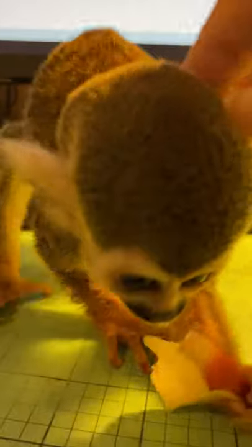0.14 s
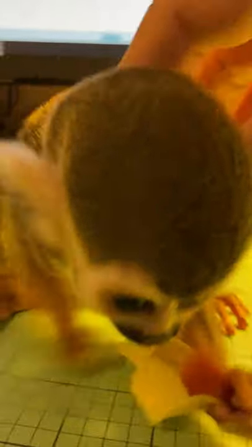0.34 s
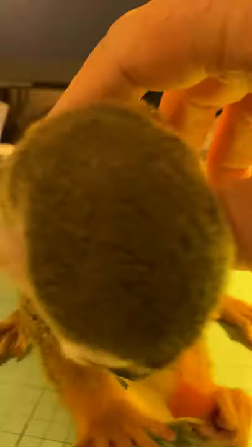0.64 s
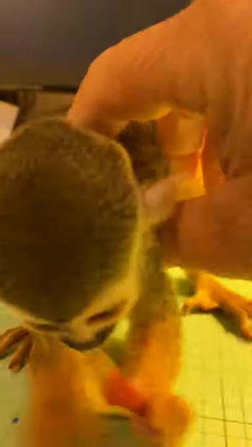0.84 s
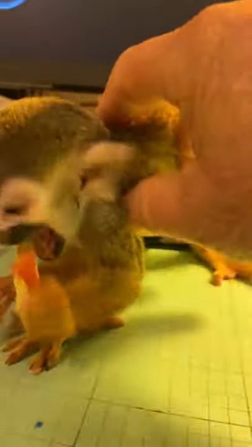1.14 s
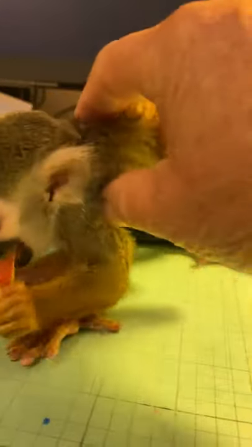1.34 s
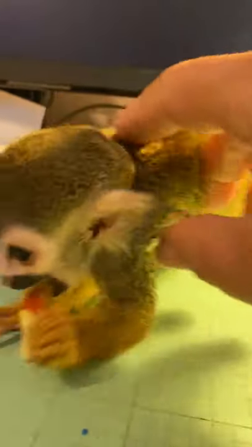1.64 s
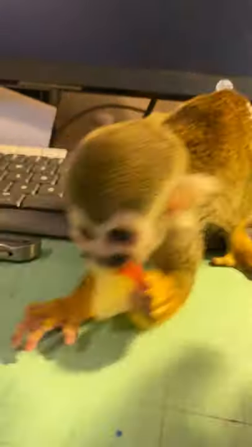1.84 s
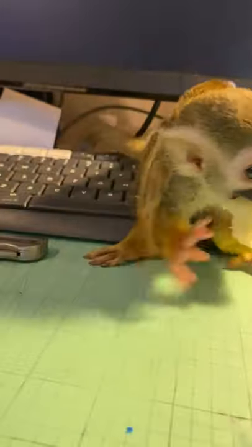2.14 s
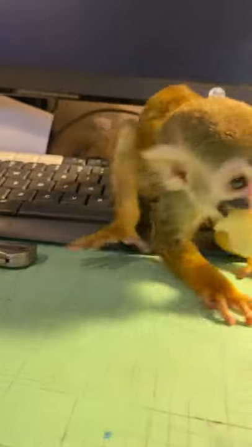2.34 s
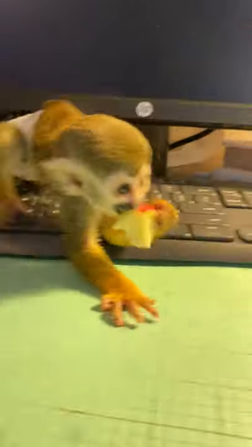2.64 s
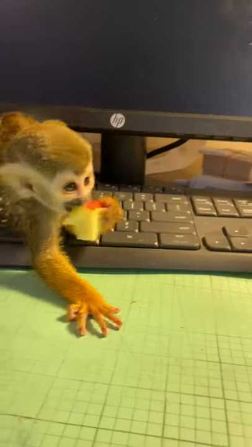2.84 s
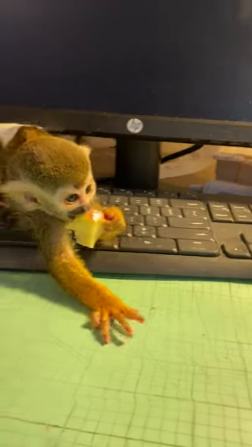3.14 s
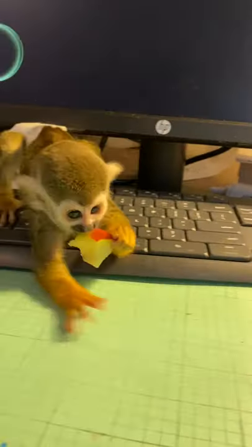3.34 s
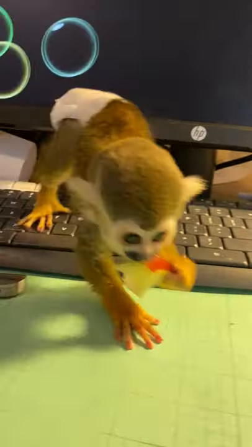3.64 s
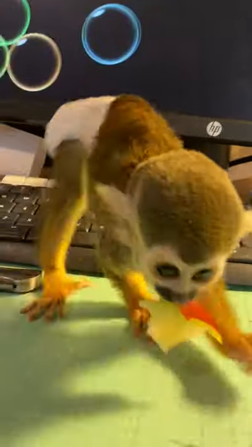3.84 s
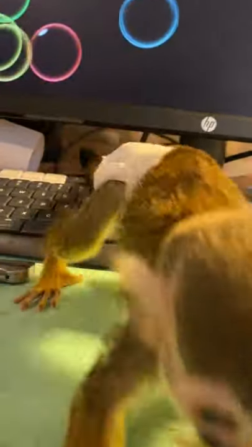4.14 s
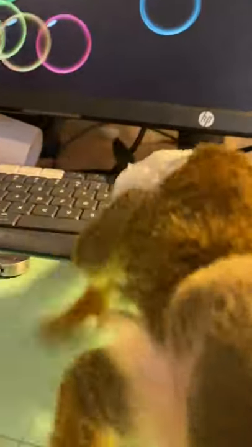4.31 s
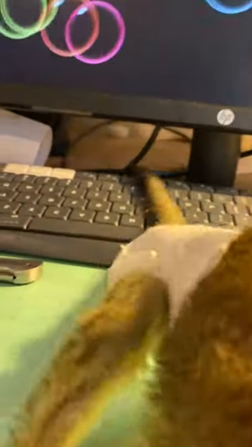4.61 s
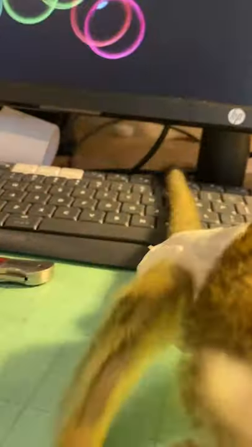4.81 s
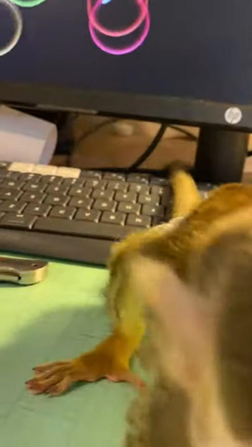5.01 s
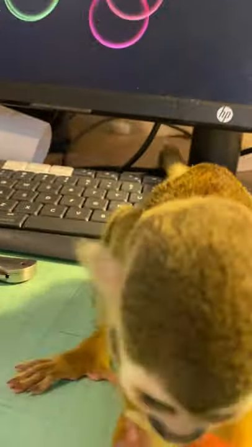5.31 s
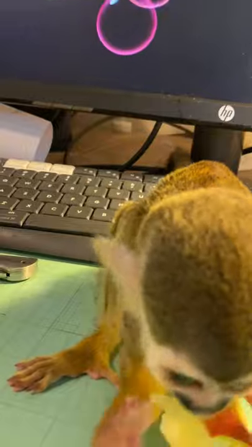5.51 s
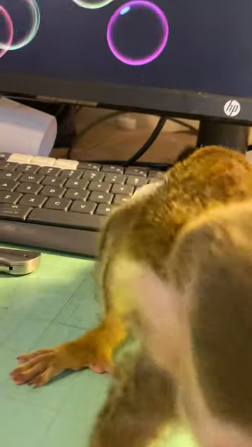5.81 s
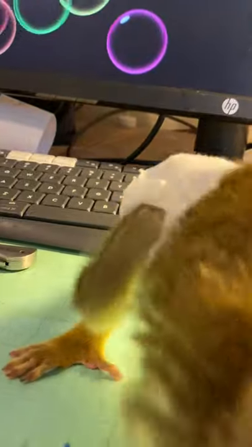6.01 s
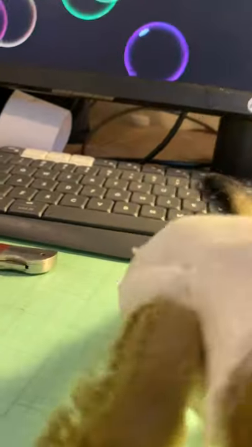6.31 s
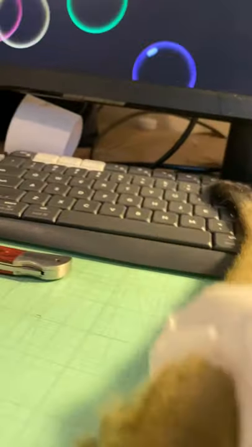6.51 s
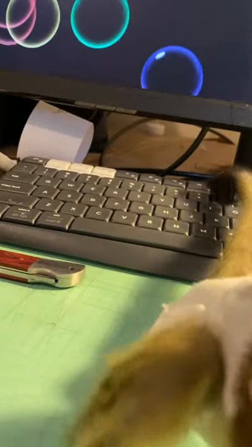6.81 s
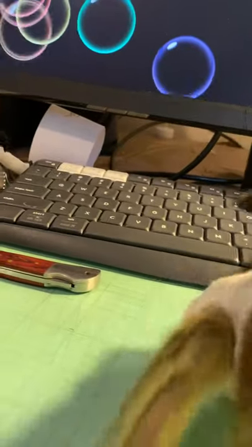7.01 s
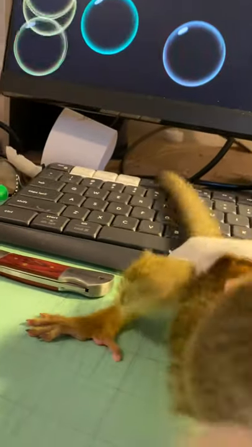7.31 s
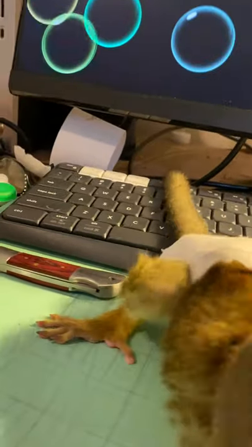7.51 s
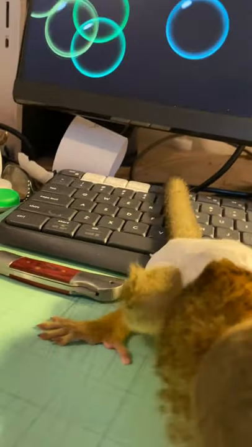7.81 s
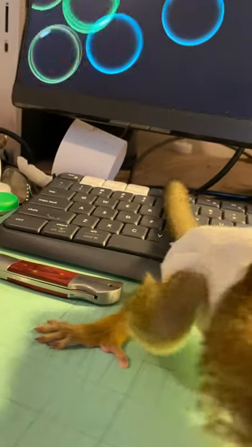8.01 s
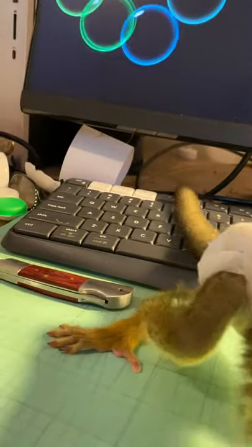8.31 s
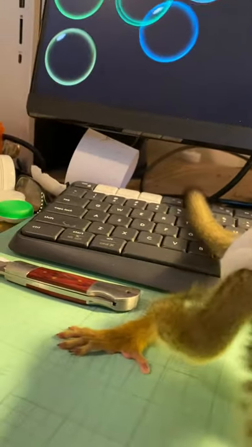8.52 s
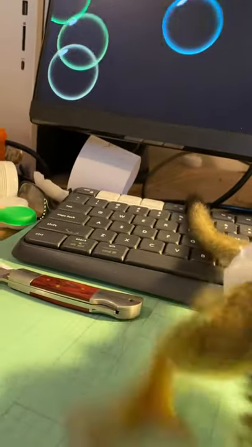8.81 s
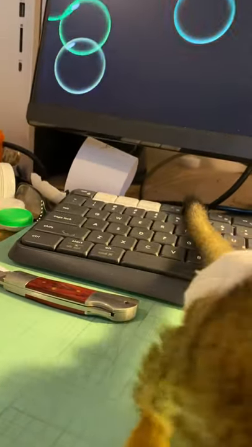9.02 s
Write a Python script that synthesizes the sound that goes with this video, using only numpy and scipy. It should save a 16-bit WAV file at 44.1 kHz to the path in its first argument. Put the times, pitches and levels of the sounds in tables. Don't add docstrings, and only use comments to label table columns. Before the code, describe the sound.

Close to the microphone in a quiet furnished room, a small monkey utters brief, very high whistled calls that glide, waver and fall. Between them are tiny claw taps on a mat and keys, plastic knocks, soft paw thuds, fur rustle and moist fruit nibbling. A longer quavering note comes near the end, followed by wet chewing and one last loud chirp. A low fan hums throughout.

```python
import sys
import numpy as np
from scipy import signal
from scipy.fft import rfft, irfft, next_fast_len
from scipy.io import wavfile
from scipy.ndimage import uniform_filter1d, map_coordinates

SR = 44100
rng = np.random.default_rng(int(sys.argv[2]) if len(sys.argv) > 2 else 0)


def materialize(psi):
    bounded = np.clip(np.atleast_2d(psi).T, -1, 1)
    quanta = np.round(bounded * 32767).astype(np.int16)
    wavfile.write(sys.argv[1], SR, quanta)


def convert_level_to_amplitude(level_db):
    exponent = np.asarray(level_db, float) / 20
    return 10 ** exponent


N = 403515
SIZE = next_fast_len(N + SR)
HZ = np.arange(SIZE // 2 + 1) * SR / SIZE

SLUR = None
# (overtone offset [dB], contour of (time [s], pitch [Hz], level [dB]))
CALL_TAIL = [
    (6, [(0.0, 6740, -18.5), (0.012, 6460, -19), (0.02, 6350, -24.5), (0.026, 6180, -24), (0.031, 6280, -23), (0.037, 6210, -26.5), (0.043, 5900, -29.5)]),
]
CALL_STROKED = [
    (3.002, [(1.01, 7930, -23.5), (1.021, 6970, -27.5)]),
    (12, [(1.024, 6870, -34), (1.034, 6330, -30.5), (1.045, 6500, -29), ]),
    (20, [SLUR, (1.052, 7250, -26)]),
    (30, [SLUR, (1.058, 7900, -24)]),
    (0, [SLUR, (1.062, 8150, -24), (1.07, 8350, -23.5), (1.077, 8125, -27), (1.09, 7500, -26), (1.094, 7300, -36)]),
    (0, [(1.114, 8650, -13), (1.122, 8900, -14), (1.126, 8880, -3.5), (1.13, 8550, -6), (1.134, 8150, -11), (1.143, 8720, -10.5), (1.149, 8240, -20), (1.159, 7480, -24)]),
    (5.5, [(1.189, 10160, -20.5), (1.203, 9783, -16), (1.223, 9180, -13.5), (1.234, 8670, -19), (1.255, 9300, -15.5), (1.276, 8550, -14.5), (1.29, 8080, -19)]),
]
CALL_BACKING = [
    (3.5, [(2.352, 7190, -35.5), (2.364, 6250, -30.5), (2.367, 6175, -20), (2.38, 6580, -15.5), (2.389, 7090, -13), (2.393, 7620, -25), (2.396, 6780, -25)]),
    (-5.5, [(2.451, 8867, -26), (2.459, 9203, -37), (2.47, 8810, -16.5), (2.479, 8230, -8), (2.491, 7580, -17.5), (2.504, 7520, -21), (2.512, 7240, -21)]),
    (-14, [SLUR, (2.533, 8160, -12), (2.555, 8070, -13)]),
    (-3, [SLUR, (2.571, 7420, -19), (2.59, 7300, -23), (2.597, 7130, -22), (2.612, 7100, -24.5), (2.622, 6380, -34.5)]),
]
CALL_COMING = [
    (0.5, [(4.023, 5754, -29), (4.028, 5687, -23), (4.039, 5080, -21), (4.043, 5115, -23)]),
    (-2.5, [SLUR, (4.046, 6040, -22)]),
    (3, [SLUR, (4.062, 6700, -23.5), (4.084, 7945, -27), (4.089, 8040, -45), (4.099, 8310, -41.5), (4.106, 8050, -28), (4.12, 7550, -28.5)]),
    (-12, [SLUR, (4.134, 7075, -28), (4.158, 6800, -22), (4.17, 6980, -24), (4.198, 6460, -16), (4.213, 6120, -22.5), (4.228, 5923, -22)]),
]
CALL_BOWED = [
    (-6.5, [(5.419, 6330, -32), (5.427, 5670, -26.5), (5.433, 5206, -31.5), (5.438, 5500, -33)]),
    (-4, [(5.441, 6010, -30.5)]),
    (4, [SLUR, (5.468, 7250, -24.5), (5.489, 8420, -20), ]),
    (-11, [SLUR, (5.514, 7650, -23.5), (5.527, 7900, -22), (5.535, 7620, -22), (5.556, 7930, -21.5)]),
    (-3, [SLUR, (5.583, 6870, -16.5), (5.61, 6860, -18), (5.626, 6880, -24), (5.634, 6900, -42)]),
]
CALL_LONG = [
    (-12, [(6.763, 6420, -37), (6.777, 6270, -29), (6.798, 7350, -30.5), (6.812, 8500, -20.5), (6.826, 8360, -21), (6.834, 8690, -19), (6.843, 8400, -40.5)]),
    (9, [(6.845, 8520, -27.5), (6.852, 8630, -50.5), (6.859, 8510, -25)]),
    (0.5, [(6.862, 9100, -24), (6.88, 9150, -23.5), (6.895, 8870, -19), (6.93, 9100, -25), (6.95, 8960, -26), (6.957, 8970, -17.5), (6.995, 8560, -18), (7.037, 8315, -12), (7.062, 8226, -15)]),
    (1, [SLUR, (7.085, 8180, -18.5), (7.12, 8100, -20), (7.165, 7760, -18.5), (7.175, 7570, -14), (7.184, 6600, -14), (7.192, 6130, -17.5), (7.196, 5570, -13), (7.203, 5600, -54)]),
]
CALL_LAST = [
    (11.5, [(8.477, 5550, -30), (8.485, 5200, -28.5), (8.492, 5175, -27.5), (8.4995, 5250, -27)]),
    (-5.5, [(8.5, 5560, -18.5), (8.508, 5470, -7), (8.516, 5990, -11)]),
    (-14, [SLUR, (8.521, 7070, -22), (8.528, 7510, -24), (8.534, 6860, -28.5)]),
    (-2, [(8.585, 8850, -19), (8.59, 8700, -17), (8.604, 8250, -20.5), (8.618, 7800, -28.5), (8.633, 7650, -30), (8.641, 8390, -18.5), (8.653, 8530, -13.5), (8.666, 8070, -10.5), (8.673, 7880, -17.5), (8.683, 7900, -12.5), (8.692, 7620, -22)]),
]
# (pitch [Hz], overtone re whistle [dB])
OVERTONE = [(5100, -14.5), (5600, -12), (6300, -5.5), (6850, -17), (7500, -28.5), (7800, -34.5),
            (8300, -38.5), (10000, -37)]
# (start [s], end [s], rate [1/s], one dip [s], depth [Hz])
QUAVER = (6.87, 7.17, 77.5, 7.093, 230)
# (time [s], length [s], level re whistle [dB])
DOUBLING = [(2.352, 0.02, -33), (5.42, 0.022, -35.5), (5.615, 0.025, -38), (6.776, 0.042, -34.5),
            (6.838, 0.0055, -13), (8.499, 0.02, -38)]
# (time [s], length [s], centre [Hz], level [dB], width ratio [1])
RASPS = [(0.003, 0.047, 8750, -57, 1.16), (0.036, .012, 4000, -66, 1.7), (.343, 0.026, 1350, -64, 1.15),
         (1.026, .05, 2200, -66, 1.6), (1.094, .008, 5000, -52, 1.4), (1.103, 0.015, 5060, -47, 1.3),
         (1.157, .004, 4000, -62, 2.5), (1.187, .005, 12000, -42, 1.3), (2.356, .03, 9700, -56, 1.06),
         (2.38, .03, 3000, -68, 1.2), (2.372, .035, 5500, -53.5, 1.12), (2.391, .007, 8640, -38, 1),
         (2.452, .025, 11200, -58.5, 1.14), (4.024, .012, 2500, -64, 1.83), (4.11, .014, 3800, -72, 1.1),
         (6.785, .03, 5050, -59, 1.22), (6.8, .02, 10500, -56, 1.15), (6.865, 0.022, 11000, -58, 1.12),
         (7.185, .015, 4000, -62, 1.15), (8.478, .04, 4400, -60, 1.1), (8.503, .05, 8900, -52, 1.06),
         (8.577, .014, 9600, -35.5, 1.15), (8.577, .012, 6000, -52, 1.2), (8.59, .025, 6000, -54, 1.2),
         (8.59, .025, 10500, -54, 1.12), (8.644, .01, 10800, -54, 1.03)]

# (time [s], peak [dB], body [Hz])
CLAWS = [(0.48, -55.5, 1360), (0.514, -51, 1660), (0.562, -51, 1180), (1.746, -48.5, 2597),
         (2.007, -56, 834), (2.164, -55.5, 2020), (2.512, -52.5, 1510), (3.212, -44, 1348),
         (4.556, -49, 890), (3.755, -51.5, 2233), (3.823, -54, 1820), (4.413, -56, 1210),
         (6.966, -45, 2870), (7.258, -45, 1892), (7.338, -46, 1270), (8.578, -53, 2550)]
# (time [s], peak [dB], body [Hz])
KNOCKS = [(0.991, -56, 829), (1.093, -33.5, 4300), (1.11, -36, 2900), (1.112, -46, 1010),
          (2.653, -52.5, 2380), (2.692, -40, 2190), (2.782, -40.5, 2230), (2.831, -41.5, 2775),
          (3.178, -51.5, 1800), (2.939, -51.5, 1640), (2.989, -55.5, 2100), (3.007, -53, 1940),
          (3.139, -50.5, 1760), (3.261, -42, 2086), (3.346, -43, 930), (4.313, -57.5, 716),
          (7.088, -48, 1259), (7.951, -47, 900), (7.968, -42, 950)]
# (time [s], peak [dB], body [Hz])
FAINT_TICKS = [(1.4248, -61.5, 1940), (1.465, -61.5, 1560), (1.8033, -64, 1730), (2.1076, -75, 1420),
               (2.5396, -50, 4050), (2.6229, -62, 1730), (2.8144, -47.5, 2800), (2.8844, -63.5, 1270),
               (3.0578, -57, 1770), (3.4244, -65, 1580), (3.488, -62.5, 2780), (3.5139, -54, 1290),
               (3.6194, -59, 2410), (3.7355, -57, 2240), (3.7843, -57, 3310), (3.9604, -63.5, 1140),
               (4.0133, -57.5, 2190), (4.3226, -62, 1040), (4.5965, -61, 1460), (4.8393, -75, 958),
               (5.5344, -66, 2770), (6.3994, -67, 2200), (6.4627, -69.5, 1450), (6.4827, -69, 4250),
               (6.693, -59.5, 3260), (7.3426, -48, 1272), (8.1344, -63, 1580), (8.8967, -63.5, 1810),
               (0.2094, -63, 1610), (0.2902, -67, 1070), (0.5894, -76, 964), (7.1676, -59, 2120),
             (8.0356, -66, 1170), (8.0701, -63, 2270), (8.2494, -63, 1440)]
# (time [s], peak [dB])
WET_TICKS = [(0.2094, -63), (0.4914, -57), (0.9014, -50.5), (1.7794, -54.5), (1.89, -60.5), (1.93, -57),
             (1.9458, -54), (1.9953, -61.5), (3.3146, -55), (3.7707, -51), (7.9943, -62), (8.0356, -54),
             (8.0542, -60.5), (8.0718, -47), (8.1197, -58.5), (8.17, -53.5), (8.2894, -60.5)]
# (time [s], peak [dB], desk pitch [Hz])
THUDS = [(1.753, -48, 209), (3.353, -41.5, 327), (4.574, -39.5, 147), (7.952, -48, 328), (7.968, -45, 373)]
# (time [s], peak [dB], end pitch [Hz], sag [Hz], sag time [s], T60 [s])
BUMP = (1.3155, -50, 55, 520, .006, .11)

# (time [s], hold [s], crisp level [dB], dull re crisp [dB])
BRUSHES = [(0.0, 0.0092, -80, 11), (.48, 0.11, -83.5, 8.5), (.85, 0.065, -74.5, -2),
           (1.77, 0.0061, -75.5, 4), (2.991, .05, -72, -8), (3.21, 0.088, -71, 2), (3.515, 0.072, -64, -4),
           (3.97, .02, -81, 8), (4.37, 0.028, -80, 4.5), (4.845, 0.13, -86.5, -5), (6.33, 0.098, -83, -3),
           (6.65, .1, -80.5, 1), (6.79, 0.093, -75.5, -21), (7.09, .2, -77.5, -5), (7.345, 0.0056, -68, -2),
           (8.05, .08, -78, -14), (8.17, 0.077, -73, 3), (8.84, 0.022, -83.5, 6.5)]
# (time [s], hold [s], dull level [dB], crisp re dull [dB])
SHIFTS = [(.05, 0.39, -72.5, -15), (1.085, 0.024, -72, 1), (1.48, 0.12, -72.5, -8.5), (2.165, .02, -77, -7),
          (2.36, 0.26, -75.5, 1.5), (2.81, 0.035, -70.5, -3), (3.36, 0.028, -70, -6.5),
          (3.8, 0.046, -72.5, 1.5), (4.06, 0.019, -73, -9), (4.24, 0.22, -76.5, -5),
          (4.559, .02, -70.5, -6), (5.42, 0.22, -82.5, 1), (6.47, 0.058, -80, -6), (6.961, .01, -68.5, -1),
          (7.96, 0.0065, -68, -27), (8.3, 0.08, -75, -8), (8.491, 0.1, -73, -6.5), (8.95, 0.16, -79, -13.5)]
# (frequency [Hz], density [dB/Hz])
DULL = [(200, -6), (350, 1.5), (700, -3.5), (950, -9), (1500, -14), (2500, -28.5)]
# (frequency [Hz], density [dB/Hz])
CRISP = [(900, -25.5), (1500, -6.5), (2200, -0.5), (2700, 0), (3300, -2.5), (4400, -2), (5500, -3.5),
         (8000, -39.5)]
# (frequency [Hz], density [dB/Hz])
AIRY = [(4000, -29), (5500, -4), (8000, -1.5), (11000, -7.5), (13500, -14.5), (16000, -18.5)]

# (frequency [Hz], density [dB/Hz])
FAN = [(20, -30.5), (53, -10), (90, -7), (161, -15.5), (210, -15), (330, -24), (500, -49.5), (16000, -71.5)]
# (frequency [Hz], width [Hz], level [dB])
FAN_TONES = [(64, 6.7, -67.5), (123.08, 8.7, -61.5), (217.4, 18, -74.5)]

# (delay [s], level [dB])
ECHOES = [
    (.0011, -28),
    (.0046, -24.5),
    (0.0092, -26),
]
# (frequency [Hz], gain [dB])
LATE_COLOUR = [(5000, -8), (7000, -6), (8000, 0), (12000, -3)]
# (frequency [Hz], left-right likeness [0-1])
LIKENESS = [(100, 0.99), (200, 0.95), (340, 0.85), (550, .2), (900, 0.18), (3000, 0.14), (5000, 0.2),
            (6000, .9), (7500, 0.98)]
# (frequency [Hz], phase [rad])
LEAD = [(0, 0), (340, -.2), (860, -2.0), (1200, -1.5), (1720, .1), (2400, .9), (3100, 1.5), (4000, .5),
        (5000, .6), (6030, 1.7), (10335, 6.2), (16000, 11.9)]
# (frequency [Hz], left minus right [dB])
BALANCE = [(250, 0), (500, -1.6), (2000, -1.2), (4500, 0)]

ONSET_CLICK_DB = -30
CLAW_CRACK_DB, KNOCK_CRACK_DB, NAIL_CRACK_DB = -5, -15, -9
BRUSH_RISE_DB_PER_S, BRUSH_FALL_DB_PER_S, BRUSH_AIR_DB = 695, 171, 1.5
SHIFT_RISE_DB_PER_S, SHIFT_FALL_DB_PER_S, SHIFT_AIR_DB = 151, 102, -11
STILL_DULL_DB, STILL_CRISP_DB, STILL_AIRY_DB = -89, -92.5, -96
FAN_DB = -65.5
ROOM_T60_S, LATE_T60_S = .16, .36


def breaths():
    joined = []
    calls = CALL_TAIL + CALL_STROKED + CALL_BACKING + CALL_COMING + CALL_BOWED + CALL_LONG + CALL_LAST
    for over_db, note in calls:
        if note[0] is not SLUR:
            joined.append([])
        joined[-1] += [(*point, over_db) for point in note if point is not SLUR]
    return joined


def whistle(wobble_hz=25):
    out, wobble, shimmer_db = np.zeros(N), drift(250), .7 * drift(220)
    rough = .3 + rms_one(uniform_filter1d(rng.standard_normal(N), 30))
    start, end, per_s, dip_s, depth_hz = QUAVER
    smooth = round(.0035 * SR)
    for breath in breaths():
        s, hz, db, over_db = np.transpose(breath)
        add(out, s[0], convert_level_to_amplitude(db[0] + ONSET_CLICK_DB) * rng.standard_normal(60) * np.hanning(60))
        i = np.arange(round(s[0] * SR), round((s[-1] + .001) * SR))
        t = i / SR
        arches = np.abs(np.sin(np.pi * per_s * (t - dip_s))) - 2 / np.pi
        quaver = arches * (t > start) * (t < end)
        pitch = uniform_filter1d(np.interp(t, s, hz) + depth_hz * quaver, smooth) + wobble_hz * wobble[i]
        level_db = uniform_filter1d(np.interp(t, s, db) + 3 * quaver, smooth) + shimmer_db[i]
        phase = 2 * np.pi * np.cumsum(pitch) / SR
        opening = (t - t[0] + (s[0] == 0)) / .0013
        closing = (t[-1] - t) / .003
        edge = np.sin(np.pi / 2 * np.clip(np.minimum(opening, closing), 0, 1)) ** 2
        doubled = sum(convert_level_to_amplitude(d) * np.exp(-((t - at - w / 2) / w * 2.2) ** 2) for at, w, d in DOUBLING)
        halves = doubled * rough[i] * (np.sin(1.5 * phase) + .3 * np.sin(phase / 2))
        over = convert_level_to_amplitude(np.interp(t, s, over_db) + np.interp(pitch, *np.transpose(OVERTONE)))
        tone = np.sin(phase) + over * np.sin(2 * phase) + halves
        out[i] += np.sqrt(2) * edge * convert_level_to_amplitude(level_db) * tone
    return out


def rasps():
    out = np.zeros(N)
    for s, length_s, hz, db, ratio in RASPS:
        puff = rng.standard_normal(4000)[:round(length_s * SR)]
        coloured = band(band(puff, hz, 2.05), hz, max(ratio, 1.02))
        add(out, s, convert_level_to_amplitude(db) * rms_one(coloured) * signal.windows.tukey(len(puff), .5))
    return out


def taps():
    out, t = np.zeros(N), np.arange(3000) / SR
    hits = [(*c, CLAW_CRACK_DB) for c in CLAWS]
    hits += [(*k, KNOCK_CRACK_DB) for k in KNOCKS]
    hits += [(*n, NAIL_CRACK_DB) for n in FAINT_TICKS]
    for s, db, hz, bright_db in hits:
        draw = rng.standard_normal((3, len(t)))
        crumbs = convert_level_to_amplitude(5 * uniform_filter1d(draw[2], 30) * np.sqrt(30))
        blow_and_rattle = np.exp(-t / .0025) + .18 * np.exp(-t / .018)
        contact = draw[0] * crumbs * blow_and_rattle
        contact[20] += 6.0 * contact[:200].std()
        body = band(contact, hz, 1.6) + .06 * ring(contact, hz, .012)
        crack = band(draw[1] * crumbs * np.exp(-t / 0.002), 4000, 2.2)
        hit = body / np.abs(body).max() + convert_level_to_amplitude(bright_db) * crack / np.abs(crack).max()
        add(out, s - .001, convert_level_to_amplitude(db + 2.2) * hit)
    return out


def wet_ticks():
    out, t = np.zeros(N), np.arange(3000) / SR
    for s, db in WET_TICKS:
        burst = rng.standard_normal(len(t)) * np.exp(-t / 0.0017)
        add(out, s, convert_level_to_amplitude(db + 2.0) * band(burst, 9270, 1.9))
    return out


def thuds(t60_s=0.13):
    out, t = np.zeros(N), np.arange(6000) / SR
    for s, db, hz in THUDS:
        phase = 2 * np.pi * np.cumsum(hz * (0.514 + 1.57 * np.exp(-t / 0.007813))) / SR
        rough = rms_one(band(rng.standard_normal(len(t)), hz * 0.48, 5.0))
        push = np.sin(phase) * np.exp(-t / 0.048) + 0.21 * rough
        add(out, s, convert_level_to_amplitude(db - 3.5 - 60 * t / t60_s) * push * np.minimum(t / 0.0035, 1))
    return out


def bump():
    out, t = np.zeros(N), np.arange(6000) / SR
    s, db, end_hz, sag_hz, sag_s, t60_s = BUMP
    phase = 2 * np.pi * np.cumsum(end_hz + sag_hz * np.exp(-t / sag_s)) / SR
    level_db = db - 60 * np.maximum(t - .02, 0) / t60_s
    add(out, s, convert_level_to_amplitude(level_db) * np.sin(phase) * np.minimum(t / 0.0042, 1))
    return out


def rustle():
    brush_crisp, brush_dull = gestures(BRUSHES, BRUSH_RISE_DB_PER_S, BRUSH_FALL_DB_PER_S)
    shift_dull, shift_crisp = gestures(SHIFTS, SHIFT_RISE_DB_PER_S, SHIFT_FALL_DB_PER_S)
    dull = brush_dull + shift_dull + convert_level_to_amplitude(2 * STILL_DULL_DB)
    crisp = brush_crisp + shift_crisp + convert_level_to_amplitude(2 * STILL_CRISP_DB)
    airy = brush_crisp * convert_level_to_amplitude(2 * BRUSH_AIR_DB) + shift_crisp * convert_level_to_amplitude(2 * SHIFT_AIR_DB) + convert_level_to_amplitude(2 * STILL_AIRY_DB)
    born = rng.random(N) < 900 * convert_level_to_amplitude(4 * drift(40)) / SR
    size_db = 3.5 * np.minimum(rng.exponential(1, (2, N)), 4)
    grains = born * convert_level_to_amplitude(size_db) * rng.choice([-1, 1], (2, N))
    rub = rms_one(grains) + rng.standard_normal((2, N))
    out = np.zeros((2, N))
    for power, colour in [(dull, DULL), (crisp, CRISP), (airy, AIRY)]:
        flutter_db = 1.5 * drift(25)
        out += np.sqrt(power) * convert_level_to_amplitude(flutter_db) * diffuse(rub, colour)
    return out


def gestures(rows, rise_db_per_s, fall_db_per_s):
    s, hold_s, db, other_db = np.transpose(rows)[:, :, None]
    t = np.arange(0, N, 64) / SR
    rise_db = rise_db_per_s * np.maximum(s - t, 0)
    fall_db = fall_db_per_s * np.maximum(t - s - hold_s, 0)
    power = convert_level_to_amplitude(2 * (db - rise_db - fall_db))
    return [np.interp(np.arange(N), t * SR, p.sum(0)) for p in (power, power * convert_level_to_amplitude(2 * other_db))]


def patchy(x, depth_db, streak_db, cells_hz=450, cells_s=.05):
    hz, s, cells = signal.stft(x, SR, nperseg=512)
    pitch, time = np.meshgrid(np.log(hz + cells_hz) * 5, s / cells_s, indexing="ij")
    draw = rng.standard_normal((2, 300, 400))
    patches = map_coordinates(draw[0], [pitch, time], order=3)
    streaks = map_coordinates(draw[1], [pitch * 5, time / 3], order=1)
    gain = convert_level_to_amplitude(depth_db * patches + streak_db * streaks)
    return signal.istft(cells * gain, SR, nperseg=512)[1][:, :N]


def fan():
    out = convert_level_to_amplitude(FAN_DB + 0.4 * drift(1.3)) * diffuse(rng.standard_normal((2, N)), FAN)
    for hz, width_hz, db in FAN_TONES:
        out += convert_level_to_amplitude(db) * rms_one(ring(rng.standard_normal(N), hz, 2.2 / width_hz))
    return out


def ducking(loud, knee_db=-21, ratio=.9, release_db_per_s=30):
    level_db = 10 * np.log10(uniform_filter1d(loud ** 2, 400) + 1e-12)
    over_db = ratio * np.maximum(level_db - knee_db, 0)
    ramp_db = release_db_per_s * np.arange(N) / SR
    return convert_level_to_amplitude(-uniform_filter1d(np.maximum.accumulate(over_db + ramp_db) - ramp_db, 400))


def room(x, early_db=-22, late_db=-34):
    t = np.arange(SR // 2) / SR
    noise = rng.standard_normal((2, 2, len(t))) * np.clip(t / 0.022, 0, 1)
    tail, colours = 0, [1, convert_level_to_amplitude(at_hz(LATE_COLOUR))]
    for draw, colour, t60_s, db in zip(noise, colours, [ROOM_T60_S, LATE_T60_S], [early_db, late_db]):
        dying = draw * convert_level_to_amplitude(-60 * t / t60_s)
        tail = tail + convert_level_to_amplitude(db) * colour * rfft(dying, SIZE) / np.sqrt(np.sum(dying[0] ** 2))
    near = 1 + sum(convert_level_to_amplitude(db) * np.exp(-2j * np.pi * HZ * s) for s, db in ECHOES)
    return irfft(rfft(x, SIZE) * (near + two_ports(*tail)), SIZE)[:, :N]


def two_ports(a, b):
    alike = np.clip(at_hz(LIKENESS), 0, 1)
    return np.array([a, alike * a + np.sqrt(1 - alike ** 2) * b])


def diffuse(source, spectrum):
    a, b = rfft(source, SIZE) * convert_level_to_amplitude(at_hz(spectrum))
    return rms_one(irfft(two_ports(a, b), SIZE)[:, :N])


def ring(clicks, hz, t60_s):
    r, w = convert_level_to_amplitude(-60 / (t60_s * SR)), 2 * np.pi * hz / SR
    return signal.lfilter([0, np.sin(w)], [1, -2 * r * np.cos(w), r * r], clicks + 1e-18)


def band(x, hz, ratio):
    edges_hz = [hz / ratio, min(hz * ratio, .45 * SR)]
    return signal.sosfilt(signal.butter(2, edges_hz, "band", fs=SR, output="sos"), x)


def drift(rate_per_s):
    knots = rng.standard_normal(400 * 10)
    place = np.minimum(np.arange(N) * rate_per_s / SR, len(knots) - 1)
    return map_coordinates(knots, [place], order=3)


def at_hz(points):
    hz, value = np.transpose(points)
    return np.interp(np.log(HZ + 1), np.log(hz), value)


def rms_one(x):
    return x / np.sqrt(np.mean(x ** 2) + 1e-20)


def add(out, s, sound):
    i = round(s * SR)
    out[i:i + len(sound)] += sound[:N - i]


def scene():
    voice = whistle() + rasps()
    contacts = taps() + wet_ticks() + thuds()
    background = patchy(rustle(), depth_db=1.5, streak_db=3.2)
    settling = convert_level_to_amplitude(4.0 * np.exp(-np.arange(N) / SR / .45))
    return room(voice + contacts) + bump() + background + fan() * ducking(voice) * settling


def top_cut(x):
    return signal.sosfilt(signal.butter(12, 16830, fs=SR, output="sos"), x)


def record(dry):
    lead_rad = np.interp(HZ, *np.transpose(LEAD))
    top = np.clip((16060 - HZ) / 80, 0, 1)
    side = np.array([[.5], [-.5]])
    response = top * np.exp(1j * lead_rad * side) * convert_level_to_amplitude(at_hz(BALANCE) * side)
    ports = irfft(rfft(dry, SIZE) * response, SIZE)[:, :N]
    return top_cut(ports)


dry = scene()
out = record(dry)
materialize(out)
```